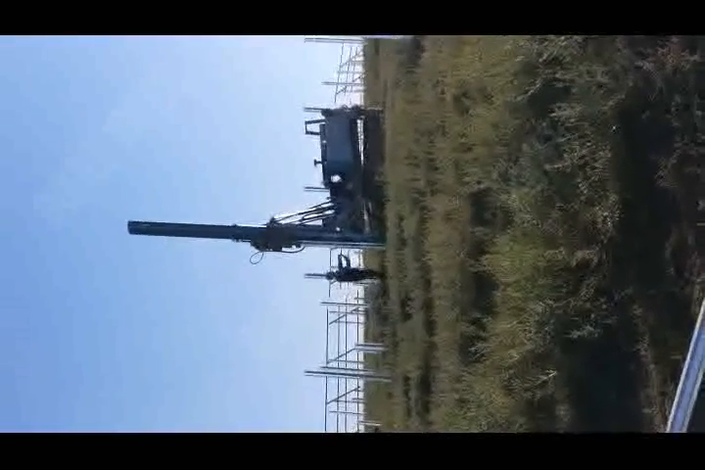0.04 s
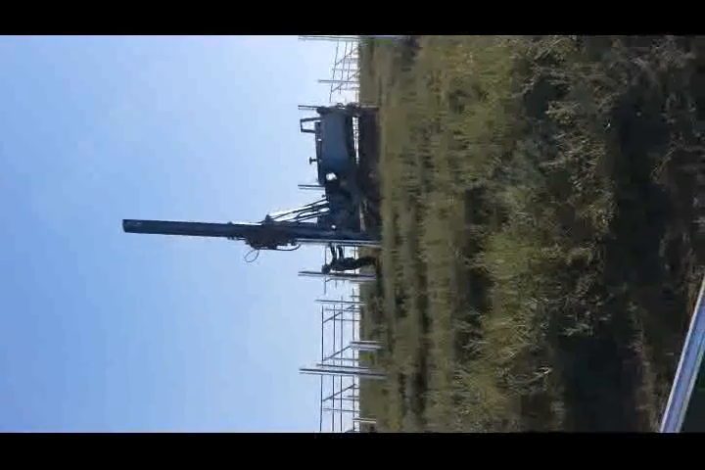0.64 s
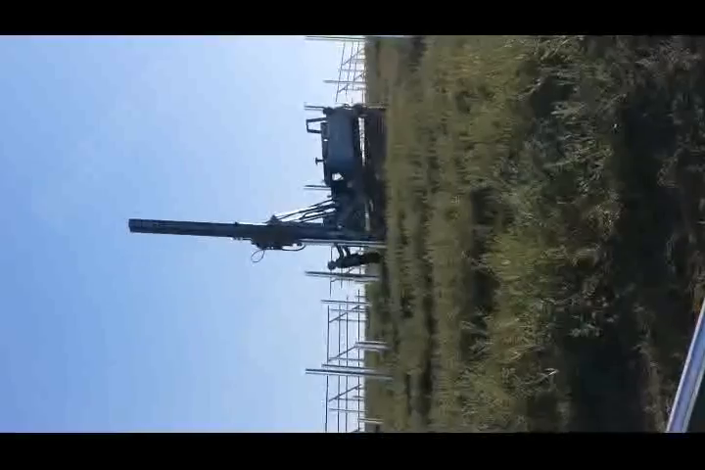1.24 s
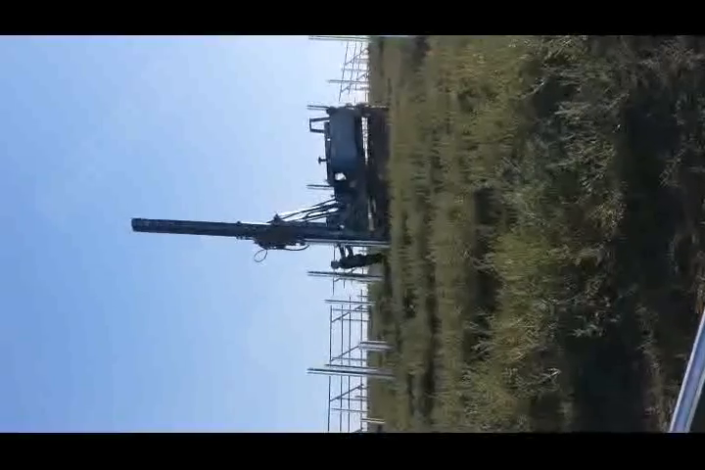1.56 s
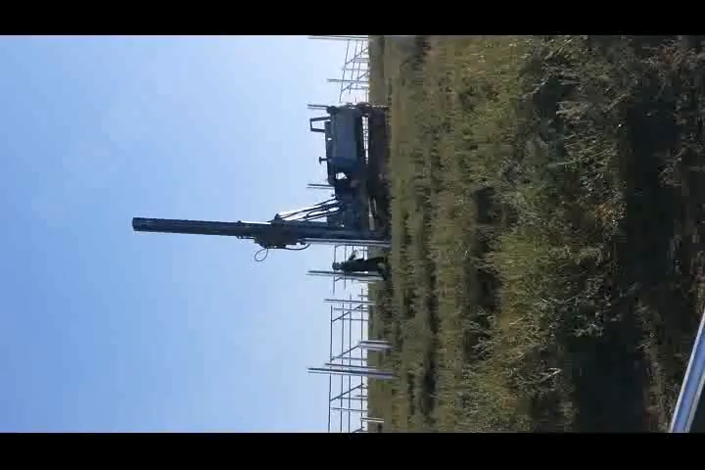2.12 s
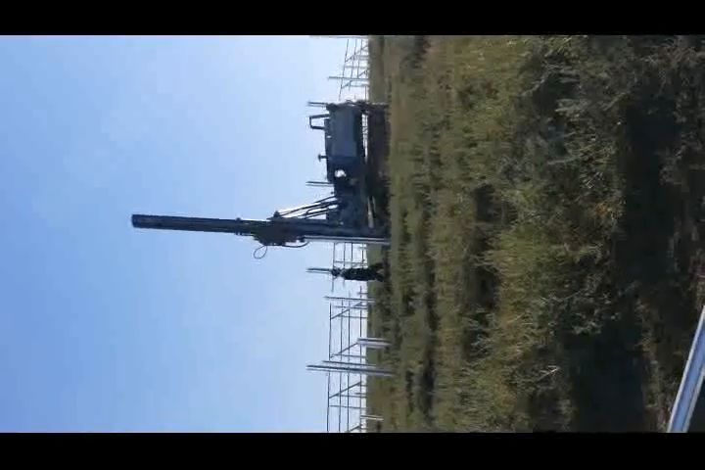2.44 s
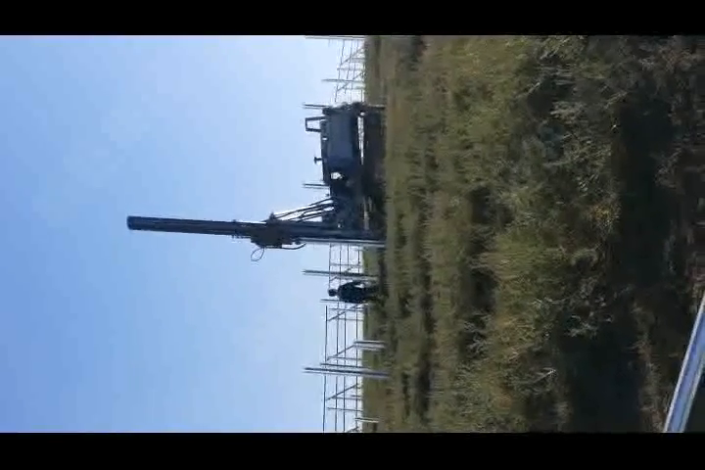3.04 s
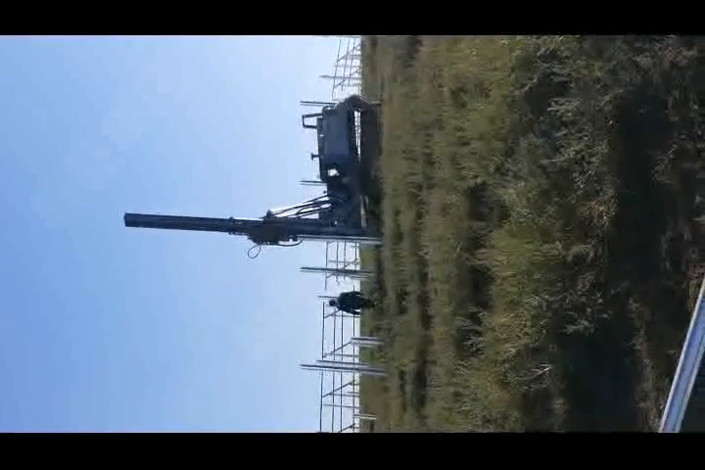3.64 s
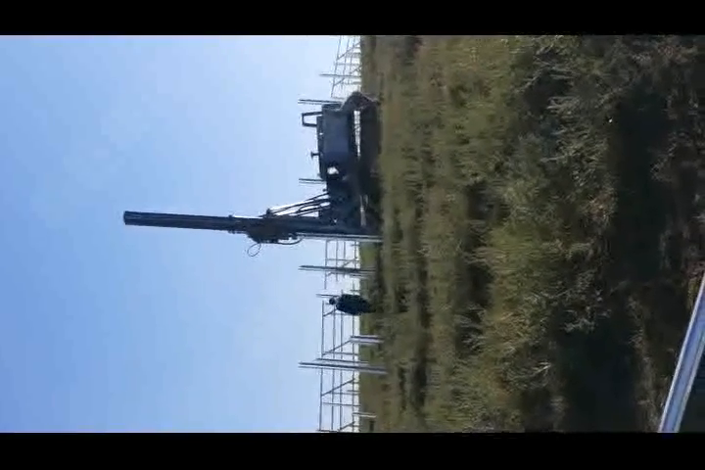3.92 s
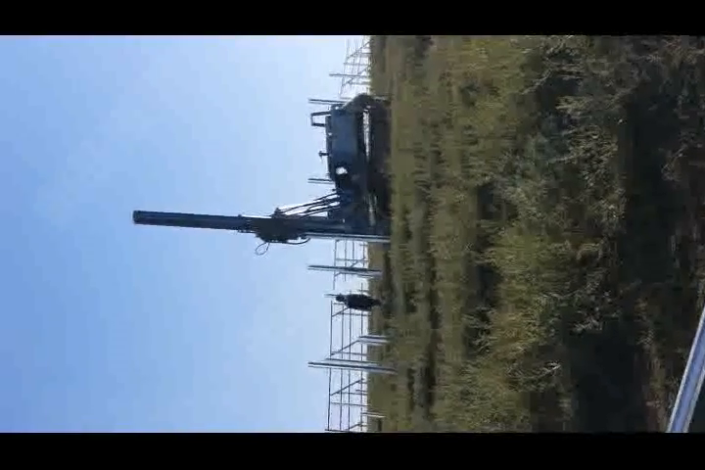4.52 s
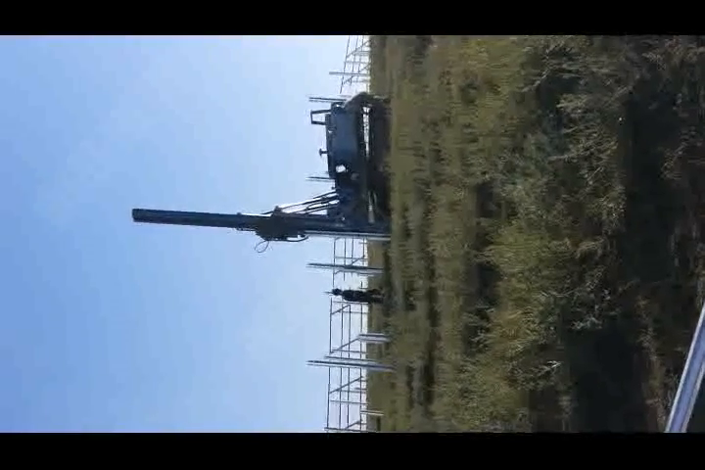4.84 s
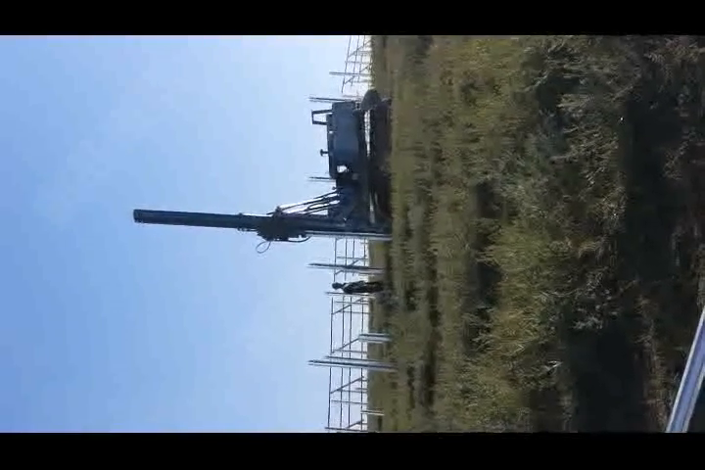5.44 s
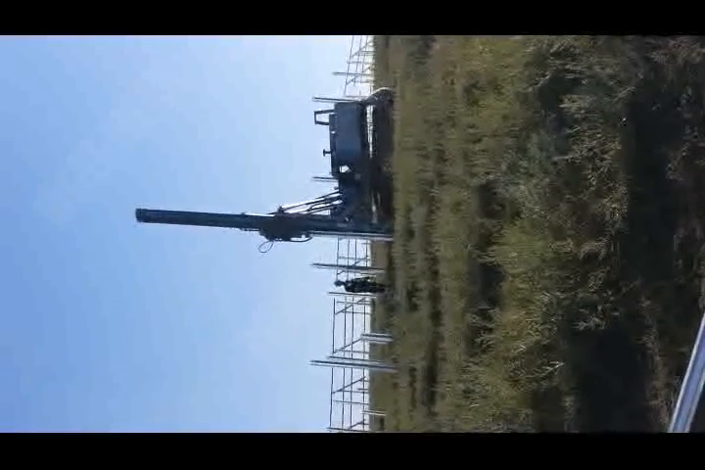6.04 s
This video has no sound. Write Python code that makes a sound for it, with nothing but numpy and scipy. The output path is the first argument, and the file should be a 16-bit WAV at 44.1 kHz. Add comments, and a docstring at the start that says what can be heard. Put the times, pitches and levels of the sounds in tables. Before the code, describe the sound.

A diesel pile-driving rig runs some way off in an open field, heard on a camera's stereo microphone. The engine starts faint and fades in between 0.5 and 1.7 seconds, puffing and clattering over a faint hum. A few light steel clinks fall in the first second, with soft low bumps near 0.8 and 1.2 seconds. From about 4.2 seconds the engine slows slightly under load and a thin hydraulic hiss rises. A high squeal arches up and down from 4.7 to 5.2 seconds, with a dry steel clack at 5. At 5.5 seconds steel slams on a steel pile, by far the loudest sound: a bright, chattering clang that rings for half a second, echoes lightly and overloads the microphone. The engine is pushed down in level afterwards. A clink follows at 5.8 seconds and a duller, shuddering knock at 6.

```python
"""An open field, a tracked pile-driving rig some way off, heard on a camera's stereo microphone.
The four-cylinder diesel fades in, puffing and clattering, with light clinks, two low bumps and a faint hum.
The hydraulics take load: the engine sags, and a valve hisses and squeals once. Steel slams on a steel
pile, which rings and knocks again, echoing off racks in the field. The clang overloads the camera,
whose gain control holds the engine down afterwards."""
import sys
import numpy as np
from scipy import signal
from scipy.fft import rfft, irfft, next_fast_len
from scipy.io import wavfile
from scipy.ndimage import uniform_filter1d

SR = 44100
rng = np.random.default_rng(int(sys.argv[2]) if len(sys.argv) > 2 else 0)


def to_wav(sig):
    """Store sig (one row per channel, or 1-D mono) as 16-bit WAV at the path in sys.argv[1].

    Samples outside -1..1 are clipped; the rate is SR.
    """
    pcm = np.clip(np.atleast_2d(sig), -1, 1) * 32767
    pcm = np.round(pcm).astype(np.int16)
    wavfile.write(sys.argv[1], SR, pcm.T)  # frames by channels


N = 276507
TIME = np.arange(N) / SR
HZ = np.fft.rfftfreq(N, 1 / SR)
LONGEST_RING_S = 0.7

# modes of the steel pile: pitch_hz, level_db, t60_s, left_over_right_db, left_lead_rad
PILE_MODES = [(780, -10, .57, 3, 0), (1829, -14, .42, 5, .2), (1849, -1.5, .47, 5.5, .2),
              (1873, -15, .47, 5, .2), (1860, -6, .47, 5.5, .2), (1895, -11, .36, 5, .2),
              (1957, -12, .18, 4, .2), (2289, -13, .14, 4, 0), (2360, -14, .19, 4.5, 0),
              (2525, -15, .11, 3, -.5), (2939, -15, .14, 3, -.8), (3358, -5.5, .13, 5.5, -1.3),
              (3472, -21, .3, 4, -1.5), (3840, -20, .28, 2, -2), (4258, -23, .3, 3, 0),
              (4605, -5, .15, 4, .6), (4667, -14, .22, 6, .5), (4732, -2, .15, 5, .4),
              (4749, -10, .43, 8, .4), (4961, -12, .22, 3, 0), (5226, -7, .11, 0, -.3),
              (5535, -8, .1, -2, -.5), (6633, -19, .12, -4, -.4), (7500, -13, .11, -2, .7),
              (7604, -13, .11, -2, .7), (7790, -16, .12, -2, .6), (9640, -15, .11, -1, -.8)]


def pile_slam():
    """Steel grazes, hits and chatters on the pile, which rings on from the first hard hit."""
    # touches within the slam: start_s, level_db
    contacts = [(5.5139, -21), (5.5162, -1.5), (5.525, -3), (5.535, -4), (5.548, -7), (5.555, -13.5)]
    out, t = np.zeros((2, N)), np.arange(round(LONGEST_RING_S * SR)) / SR
    for start_s, db in contacts:
        touch = blow(t60_s=0.073, bright_db=1.43, pile_db=0, pile_t60_scale=0.14, fitting_db=-9.5)
        add(out, start_s, gain_of(db) * touch)
    long_ring = gain_of(-1.5) * ring(PILE_MODES, t, t60_scale=0.79, bright_db=1.5)
    add(out, 5.518, long_ring)
    return out


def fitting_clinks():
    """A loose steel fitting taps lightly against the pile."""
    # taps: start_s, level_db, brightness_db_per_octave
    clinks = [(.081, -42, -1), (.636, -39, -2), (0.819, -34, -7), (.893, -31.5, -5.5), (5.727, -43, 15),
              (5.838, -23.5, -3.5)]
    out = np.zeros((2, N))
    for start_s, db, bright_db in clinks:
        tap = blow(t60_s=0.077, bright_db=bright_db, pile_db=-3.5, pile_t60_scale=0.32, fitting_db=-0.5)
        add(out, start_s, gain_of(db) * tap)
    return out


def dead_clacks():
    """Steel knocks and hardly rings; the frame shudders after it, longer and duller."""
    # knocks: start_s, level_db, t60_s, brightness_db_per_octave, shudder_db
    clacks = [(5.011, -26, .045, 2, -11), (6.022, -23, .12, 0.5, -2.5)]
    out, t = np.zeros((2, N)), np.arange(round(LONGEST_RING_S * SR)) / SR
    for start_s, db, t60_s, bright_db, shudder_db in clacks:
        knock = blow(t60_s, bright_db, pile_db=-23, pile_t60_scale=0.2, fitting_db=-26)
        shudder = clash(t, 2.9 * t60_s, bright_db=-2.5)
        add(out, start_s, gain_of(db) * knock)
        add(out, start_s + 0.01, gain_of(db + shudder_db) * shudder)
    return out


def blow(t60_s, bright_db, pile_db, pile_t60_scale, fitting_db):
    """One touch of steel on steel: it clashes, rings the pile and jingles the loose fitting."""
    # modes of the fitting: pitch_hz, level_db, t60_s, left_over_right_db, left_lead_rad
    fitting_modes = [(2370, -2, .09, 3, 0), (2450, -5, .06, 3, 0), (4620, -8, .1, 3, .5),
                     (5020, -10, .06, 0, 0), (7620, -14, .07, -2, .5), (7760, -14, .06, -2, .5),
                     (10050, -23, .05, 0, 0)]
    length_s = np.clip(max(t60_s, LONGEST_RING_S * pile_t60_scale), 0.12, LONGEST_RING_S)
    t = np.arange(next_fast_len(round(SR * length_s))) / SR
    pile = gain_of(pile_db) * ring(PILE_MODES, t, pile_t60_scale, bright_db)
    jingle = gain_of(fitting_db) * ring(fitting_modes, t, t60_scale=1, bright_db=0, bloom_cycles=4)
    return clash(t, t60_s, bright_db) + pile + jingle


def ring(table, t, t60_scale, bright_db, bloom_cycles=13):
    """Modes swell as the blow spreads through the steel; close pairs beat. bright_db is per octave."""
    hz, db, t60_s, side_db, lead = np.transpose(table)[:, :, None]
    sign = (-1) ** np.arange(len(table))[:, None]  # every other mode starts in the opposite direction
    level_db = db + bright_db * np.log2(hz / 3000) - 60 * t / (t60_s * t60_scale)
    bloom = 1 - np.exp(-t * hz / bloom_cycles)
    modes = sign * gain_of(level_db) * np.exp(2j * np.pi * hz * t) * bloom
    pan = gain_of(side_db / 2) * np.exp(0.5j * lead)
    return np.array([(modes * pan).sum(0).imag, (modes / pan).sum(0).imag])


def clash(t, t60_s, bright_db, alike_below_hz=1500):
    """Countless short-lived modes: a noise burst, alike left and right only in its lower part."""
    # spectrum of steel on steel: frequency_hz, level_db
    spectrum = [(35, -56), (60, -14.5), (632, -22.5), (780, -14.5), (1080, -13.5), (1530, -12), (1850, -9),
                (2130, -8.5), (3090, -15.5), (3310, -10), (4280, -20), (4810, -11.5), (5800, -20.5),
                (7670, -19.5), (15800, -37.5)]
    # its balance at the microphone: frequency_hz, left_over_right_db
    balance = [(60, 1), (110, -2), (200, 0), (380, 1.5), (700, 0), (1290, 1), (2380, 6), (4400, 0.5),
               (8120, -3), (15000, 0)]
    hz = np.fft.rfftfreq(len(t), 1 / SR)
    left, unrelated = rfft(rng.standard_normal((2, len(t))))
    same = 1 / np.sqrt(1 + (hz / alike_below_hz) ** 2)
    right = same * left + np.sqrt(1 - same ** 2) * unrelated
    tilt = gain_of(curve_at(balance, hz) / 2)
    colour = gain_of(curve_at(spectrum, hz) + bright_db * np.log2(np.clip(hz, 400, 13000)))
    burst = unit_rms(irfft(np.array([left * tilt, right / tilt]) * colour, len(t)))
    attack = 1 - np.exp(-t / 0.00042)
    return burst * attack * gain_of(-60 * t / t60_s)


def diesel(idle_hz=44.15, sag_hz=2):
    """Four cylinders fire in turn, slower under load, pulsing exhaust, clatter, fizz and injector ticks."""
    # cylinders in firing order: knock_db, tick_db
    cylinders = [(1, 2), (-1, -2), (.5, 0), (-1, -2)]
    # the engine's treble fizz: frequency_hz, level_db
    fizz_spectrum = [(2240, -40), (3800, -5.5), (4230, -7.5), (4600, 0.5), (4880, -5.5), (5270, -2.5),
                     (5910, -10.5), (9240, -16), (11000, -27), (14600, -26), (15800, -27)]
    knock_db, tick_db = np.transpose(cylinders)
    load = pump_load()
    firing_hz = (idle_hz - sag_hz * load) * (1 + 0.0038 * wander(5))
    firings = np.cumsum(firing_hz) / SR
    note = exhaust_note(firings, load)
    knocks = firing_pulses(firings, knock_db, scatter_db=1.3)
    puffs = exhaust_puffs(knocks, load)
    clatter = cover_clatter(knocks, load)
    fizz = gain_of(-52 + 0.31 * load) * rig_noise(4.7 + knocks, gain_of(curve_at(fizz_spectrum, HZ)))
    needles = firing_pulses(firings, tick_db, scatter_db=1.5)
    injector_ticks = gain_of(-56 - 11.6 * load) * rig_noise(needles, resonance(4500, 230))
    return note + puffs + clatter + fizz + injector_ticks


def firing_pulses(firings, cylinder_db, scatter_db, decay_periods=0.33):
    """A burst at each firing, dying within a share of the period; no two are quite alike."""
    number = firings.astype(int)
    size_db = cylinder_db[number % len(cylinder_db)] + scatter_db * rng.standard_normal(N)[number]
    return unit_rms(gain_of(size_db) * np.exp(-(firings % 1) / decay_periods))


def exhaust_note(firings, load):
    """The exhaust drones at multiples of the firing rate and hardens under load."""
    # partials of the drone: firing_multiple, level_db, full_load_lift_db
    partials = [(1, -48.5, -1.5), (2, -55.5, 3.5), (4, -55, 0), (5, -56, 6), (6, -57, 3)]
    note = np.zeros(N)
    for multiple, db, lift_db in partials:
        amplitude = np.sqrt(2) * gain_of(db + lift_db * load + wander(11))
        note += amplitude * np.sin(2 * np.pi * (multiple * firings + rng.random()))
    return note


def exhaust_puffs(knocks, load):
    """Gas puffs out through the silencer, blowing harder for a moment early on."""
    # exhaust noise: frequency_hz, level_db
    spectrum = [(12, -36), (20, 2), (32, -19), (43, -25), (54, -8), (65, -4.5), (92, -4), (119, -6.5),
                (177, 1.5), (248, 2.5), (373, -16.5), (432, -8.5), (613, -27.5), (660, -44), (860, -39),
                (1450, -120)]
    blast_db = 3 * swell(start_s=0.74, length_s=1.16)
    level_db = -42.5 + blast_db - 0.26 * load + 0.5 * wander(5.3)
    colour = gain_of(curve_at(spectrum, HZ)) * (1 - resonance(25, 25))
    return gain_of(level_db) * rig_noise(4 + knocks, colour)  # the silencer evens the firings out


def cover_clatter(knocks, load):
    """Combustion clatters through the engine cover and rings its panels."""
    # noise of the engine block: frequency_hz, level_db
    spectrum = [(360, -56), (620, -24), (783, -14), (827, -12), (967, -9.5), (1240, -2), (1470, -2.5),
                (1590, -7.5), (1810, -1.5), (2080, 0), (2350, -5), (2950, -4.5), (3480, -7.5), (3760, -23),
                (4000, -13), (5200, -55), (8800, -120)]
    # panel resonances: pitch_hz, width_hz, lift_db
    panels = [(846, 9.8, 12), (914, 7.9, 11), (1195, 40, 2), (1271, 20, 6), (1360, 13, 5.5), (1780, 69, 2),
              (2042, 43, 4), (2910, 17, 6), (3420, 24, 5.5)]
    cover_db = curve_at(spectrum, HZ) + sum(db * resonance(hz, width) for hz, width, db in panels)
    level_db = -39.5 + 1.16 * load + 0.34 * wander(7.7)
    return gain_of(level_db) * rig_noise(6.3 + knocks, gain_of(cover_db))


def pump_load():
    """Load on the hydraulic pump, rising from 0 to 1 and holding."""
    return ramp(start_s=4.15, length_s=0.547)


def hydraulics(squeal_hz=4840, arch_hz=446):
    """Oil hisses through a valve as the pump takes load, and squeals once as the pressure tops out."""
    arch = np.sin(np.pi * ramp(start_s=4.66, length_s=0.52))  # shapes both pitch and level
    phase = 2 * np.pi * np.cumsum(squeal_hz + arch_hz * arch + 70 * wander(24)) / SR
    squeal_level = gain_of(-50 + 4.1 * wander(14)) * arch
    rough_tone = wander(110) * np.cos(phase) + wander(110) * np.sin(phase)
    flicker = gain_of(4.5 * wander(14))
    hiss = gain_of(-59) * rig_noise(flicker, resonance(6600, 6100))
    return squeal_level * rough_tone + pump_load() * hiss


def rig_noise(envelope, colour):
    """Shaped noise from the rig as it reaches the two microphone ports; their mean has rms 1."""
    # how alike the ports sound: frequency_hz, coherence
    likeness = [(280, .998), (390, .85), (480, .93), (630, .5), (850, .94), (1700, .97), (2300, .9),
                (2600, .72), (3300, .82), (3900, .55), (4600, .72), (7000, .33), (15000, .2)]
    # phase between the ports: frequency_hz, left_lead_rad
    phase_lead = [(360, 0), (450, .5), (780, .1), (1200, .3), (1700, 0), (2100, -.05), (2400, .2),
                  (2600, -1.05), (3000, -.8), (3500, -1.6), (4000, -3.3), (4600, -5.6), (9000, -6.2),
                  (12000, -9.5)]
    # balance of the ports: frequency_hz, left_over_right_db
    balance = [(280, 0), (390, -1.5), (500, 2), (660, -2), (900, -1.5), (1200, 1), (1700, 0), (2150, 3),
               (2500, 5), (4400, 2.5), (5400, 0), (6500, -6), (10000, -.5), (15000, 4)]
    same, lead = curve_at(likeness, HZ), curve_at(phase_lead, HZ)
    tilt = gain_of(curve_at(balance, HZ) / 2)
    left, unrelated = rfft(rng.standard_normal((2, N)) * envelope)
    right = (same * left + np.sqrt(1 - same ** 2) * unrelated) * np.exp(-1j * lead)
    summed_gain = np.sqrt(tilt ** 2 + tilt ** -2 + 2 * same * np.cos(lead))
    pair = irfft(np.array([left * tilt, right / tilt]) * colour / summed_gain, N)
    return pair / pair.mean(0).std()


def open_field(x, scatter_db=-12.5, air_hz=4000):
    """Adds echoes off the racks and a thin tail scattered off the ground, both dulled by the air."""
    # rack echoes: delay_s, level_db
    echoes = [(.083, -28), (.094, -21), (.2, -29), (0.254, -35)]
    # decay of the ground scatter: frequency_hz, t60_s
    ground_decay = [(150, 0.12), (800, 0.94), (2000, 0.36), (5000, 0.54), (12000, .25)]
    taps = rng.choice([-1., 1.], (2, SR)) * (rng.random((2, SR)) < 2000 / SR)
    hz, t, spectra = signal.stft(taps, SR, nperseg=256)
    decay = gain_of(-60 * t / curve_at(ground_decay, hz)[:, None])
    tail = signal.istft(spectra * decay, SR, nperseg=256)[1]
    tail *= gain_of(scatter_db) / np.linalg.norm(tail[0])
    for delay_s, db in echoes:
        add(tail, delay_s, gain_of(db) * np.ones((2, 1)))
    far = signal.sosfilt(signal.butter(2, air_hz, fs=SR, output="sos"), tail)
    return x + signal.fftconvolve(x, far, axes=1)[:, :N]


def low_bumps():
    """Short swells of deep rumble, dead centre."""
    # soft bumps: start_s, level_db, length_s
    bumps = [(0.795, -35.5, 0.12), (1.2, -39, 0.16)]
    level = sum(gain_of(db) * swell(start_s, length_s) for start_s, db, length_s in bumps)
    return level * unit_rms(irfft(rfft(rng.standard_normal(N)) * resonance(75, 110), N))


def hum(pitch_hz=99.7, level_db=-58):
    """A faint hum beside the engine note, wavering slightly in level."""
    return np.sqrt(2) * gain_of(level_db + 1.5 * wander(3)) * np.sin(2 * np.pi * pitch_hz * TIME)


def gain_of(db):
    """Decibels to amplitude."""
    return 10 ** (np.asarray(db) / 20)


def unit_rms(x):
    """Scales to rms 1."""
    return x / np.sqrt(np.mean(x ** 2) + 1e-20)


def curve_at(points, hz):
    """Interpolates a table on a log-frequency axis."""
    point_hz, value = np.transpose(points)
    return np.interp(np.log(hz + 1), np.log(point_hz + 1), value)


def resonance(hz, width_hz):
    """A bell-shaped peak of height 1 over frequency."""
    return 1 / (1 + (2 * (HZ - hz) / width_hz) ** 2)


def wander(rate_hz):
    """Random drift of rms 1, mostly slower than rate_hz."""
    return unit_rms(irfft(rfft(rng.standard_normal(N)) / (1 + (HZ / rate_hz) ** 4), N))


def ramp(start_s, length_s):
    """Rises evenly from 0 to 1 and stays there."""
    return np.clip((TIME - start_s) / length_s, 0, 1)


def swell(start_s, length_s):
    """Rises smoothly from 0 to 1 and falls back."""
    return np.sin(np.pi * ramp(start_s, length_s)) ** 2


def add(mix, start_s, sound):
    """Mixes a stereo sound in at start_s."""
    part = mix[:, round(start_s * SR):][:, :sound.shape[1]]
    part += sound[:, :part.shape[1]]


def scene():
    """The rig from across the field; only the struck steel echoes."""
    running_rig = diesel() + hum() + hydraulics() + low_bumps()
    steel = pile_slam() + fitting_clinks() + dead_clacks()
    return running_rig + open_field(steel)


def record(dry, threshold_db=-9, ceiling=0.92, top_hz=15900):
    """The camera: fade-in, gain control that drops fast and recovers slowly, soft overload, band limit."""
    fade_db = 19 * (ramp(start_s=0.46, length_s=1.23) - 1)
    step_db = 5 * (ramp(start_s=0.81, length_s=0.061) - 1)  # one quick step up on the way
    x = dry * gain_of(fade_db + step_db)
    power_db = 10 * np.log10(abs(uniform_filter1d((x ** 2).mean(0), size=200)) + 1e-12)
    slope_db = -5 * TIME
    held_db = np.maximum.accumulate(power_db + slope_db) - slope_db
    over_db = np.maximum(held_db - threshold_db, 0)
    x = x / gain_of(0.54 * uniform_filter1d(over_db, size=100))
    x = x / (1 + (x / ceiling) ** 6) ** (1 / 6)
    lowpass = signal.firwin(511, top_hz, window=("kaiser", 9), fs=SR)
    return signal.oaconvolve(x, lowpass[None], "same")


dry = scene()
out = record(dry)
to_wav(out)
```